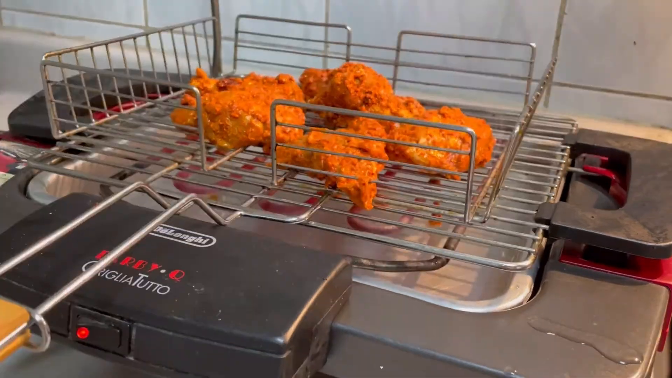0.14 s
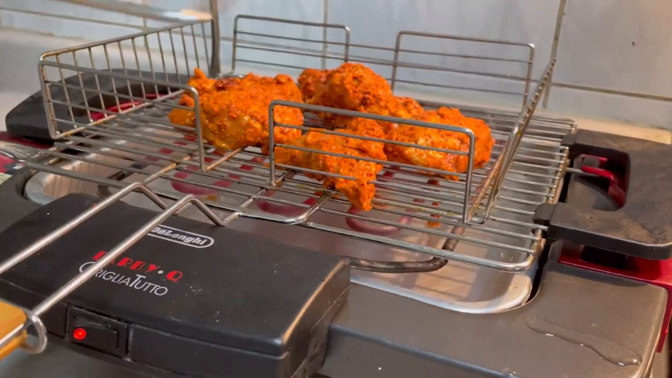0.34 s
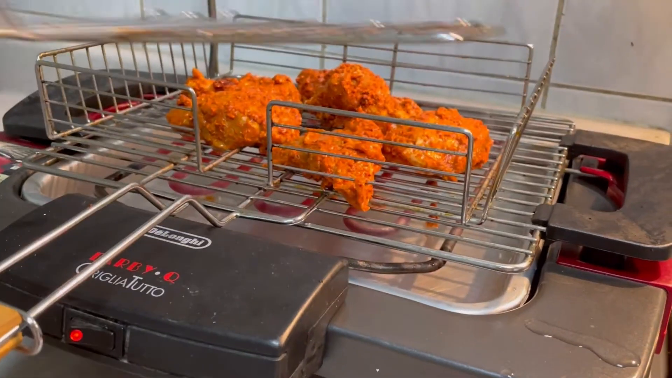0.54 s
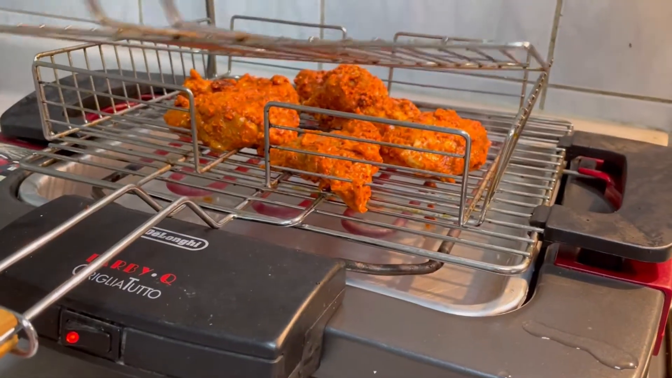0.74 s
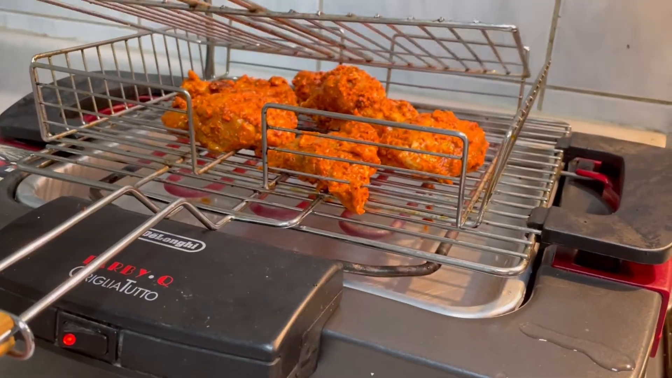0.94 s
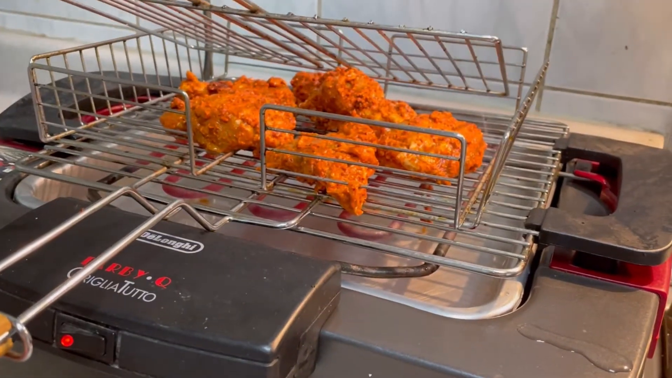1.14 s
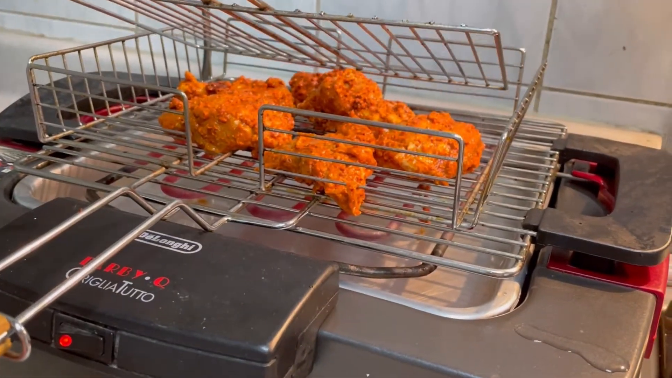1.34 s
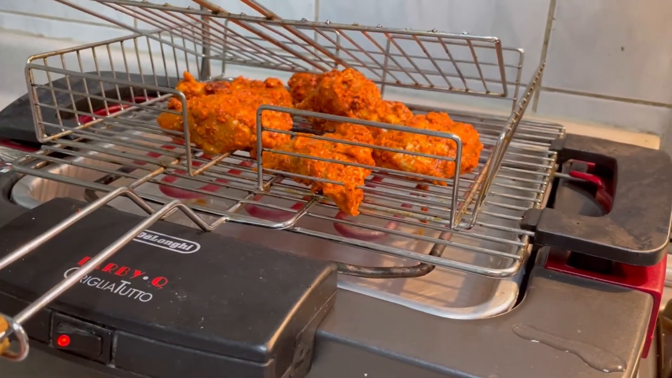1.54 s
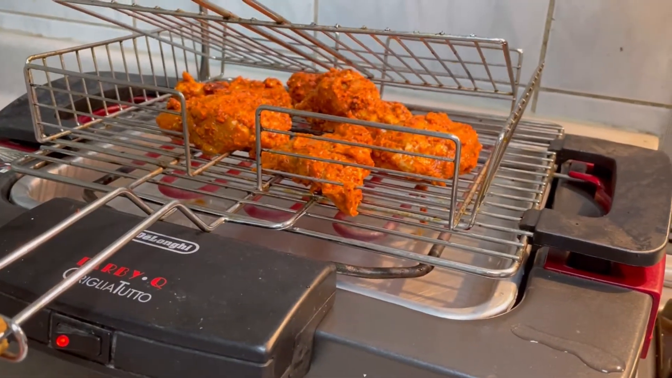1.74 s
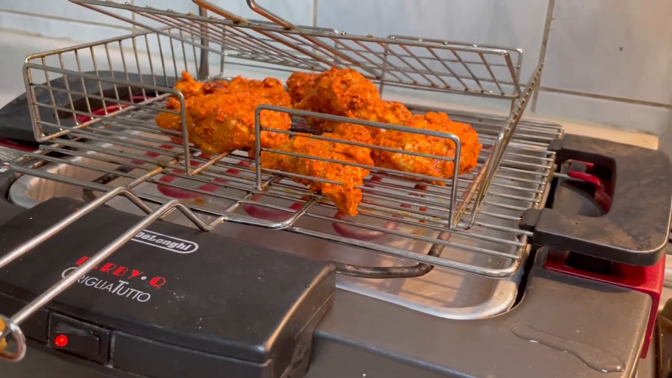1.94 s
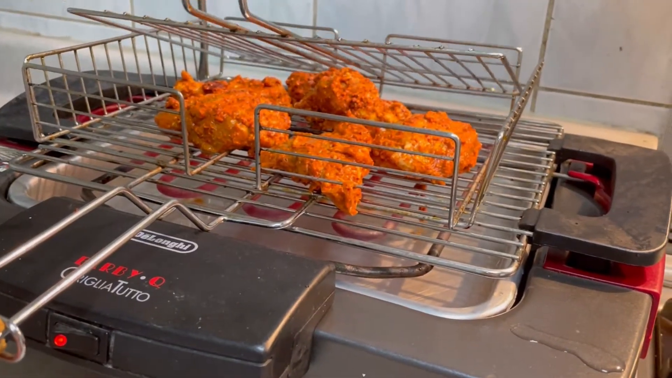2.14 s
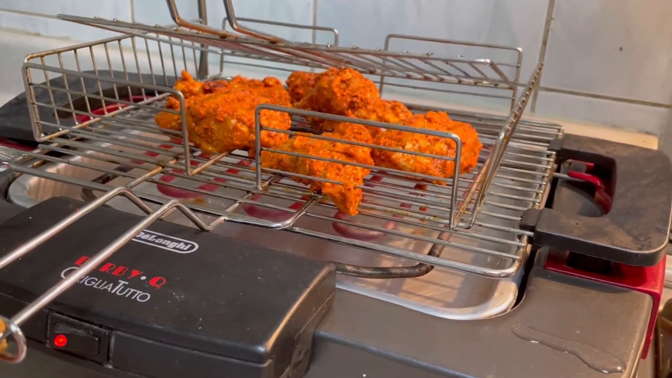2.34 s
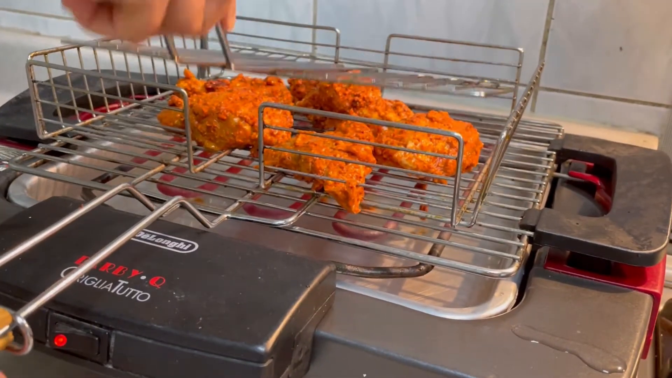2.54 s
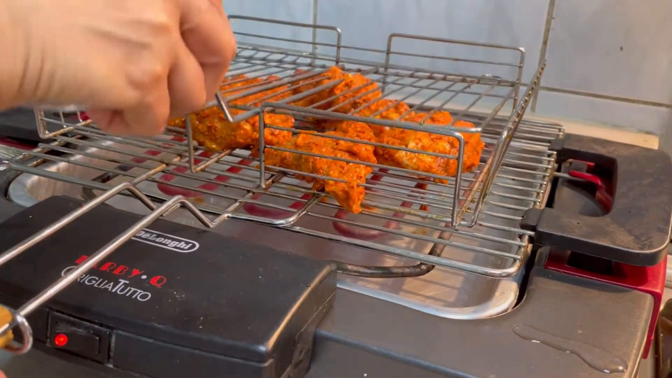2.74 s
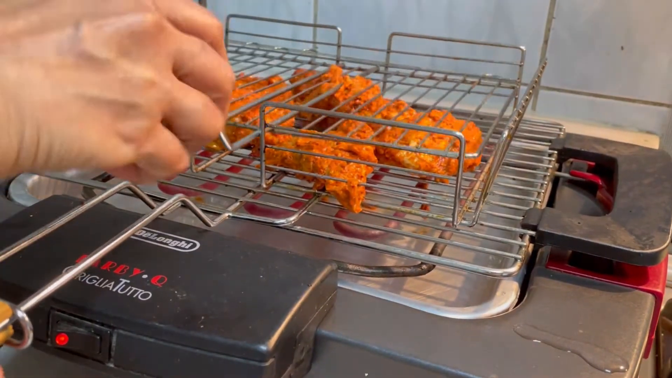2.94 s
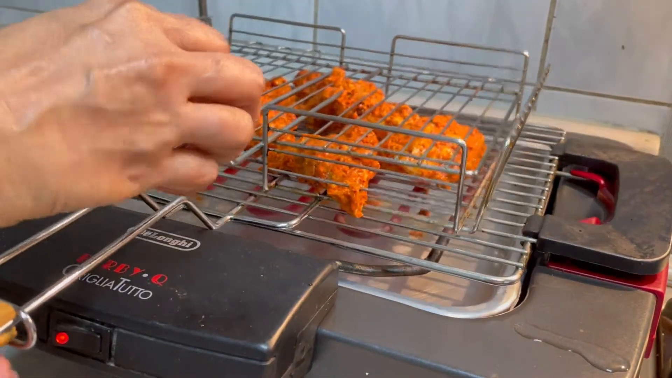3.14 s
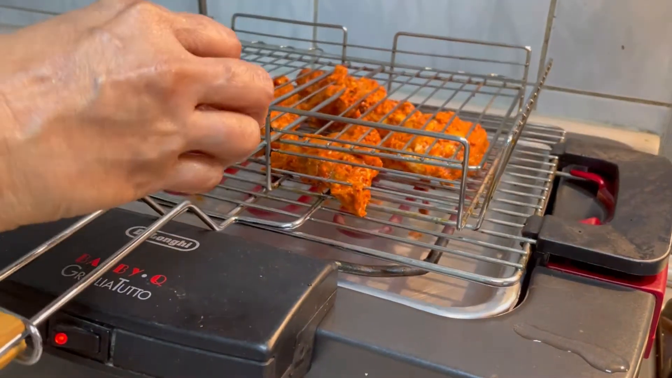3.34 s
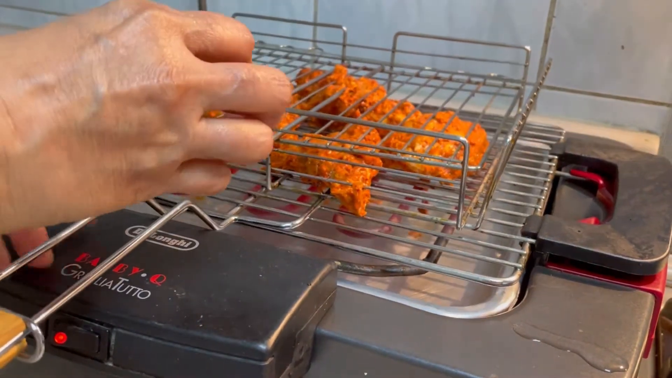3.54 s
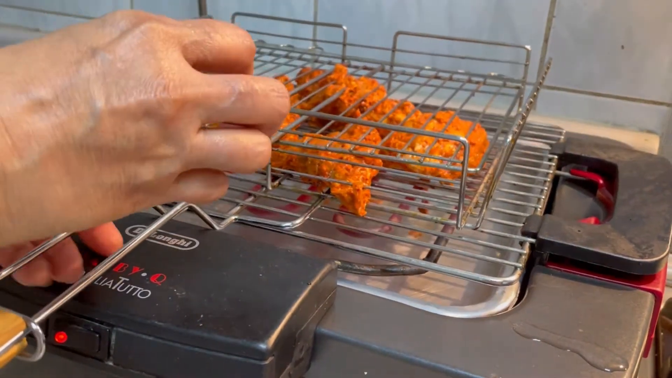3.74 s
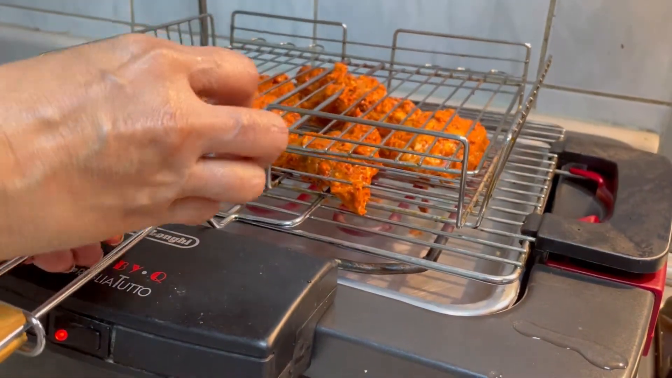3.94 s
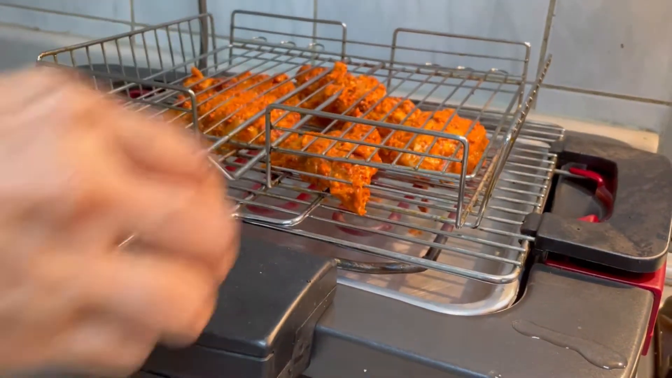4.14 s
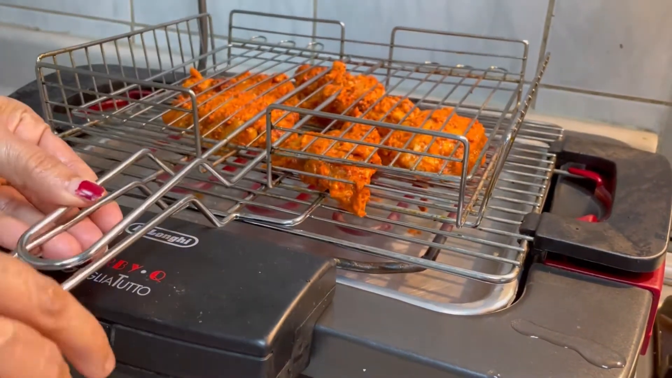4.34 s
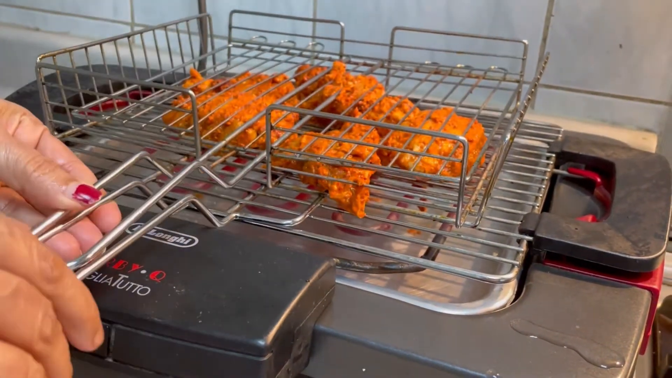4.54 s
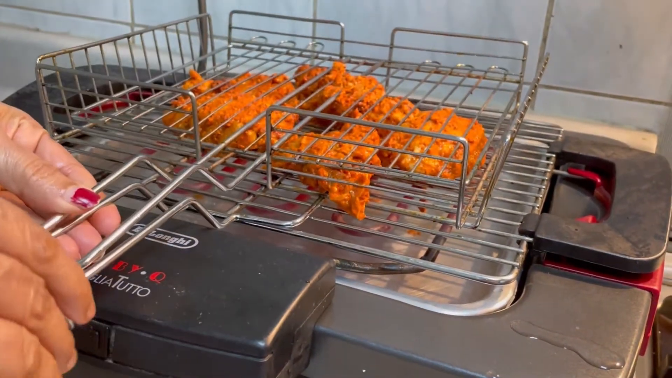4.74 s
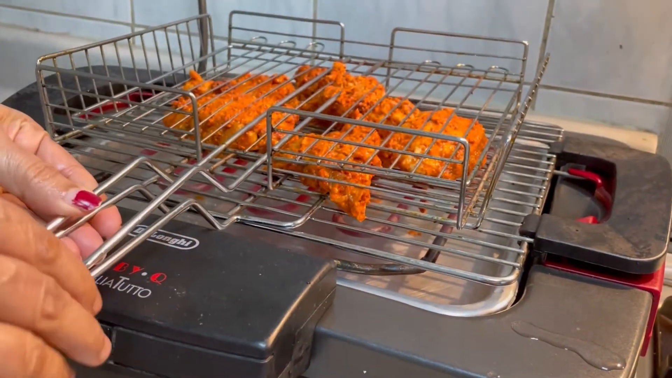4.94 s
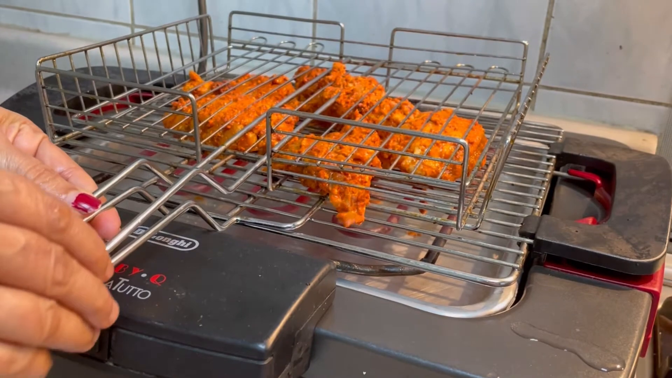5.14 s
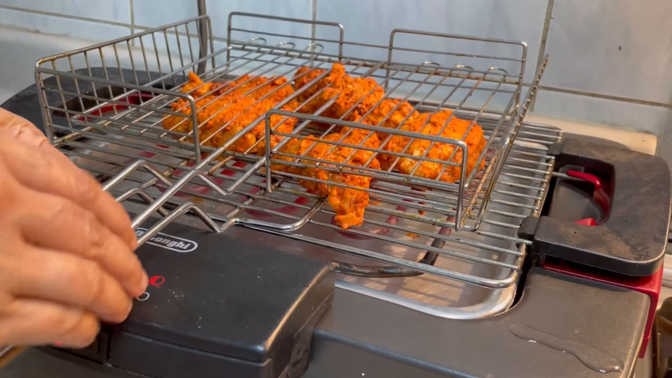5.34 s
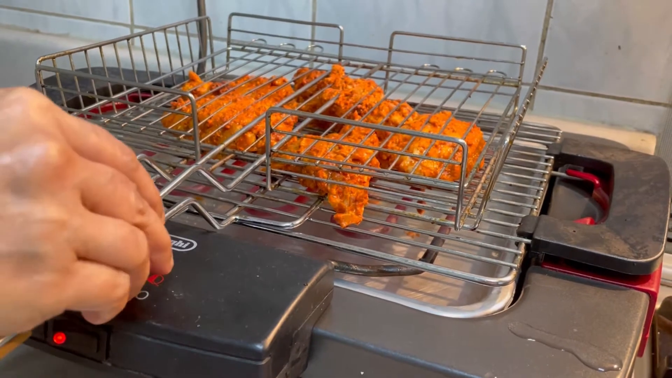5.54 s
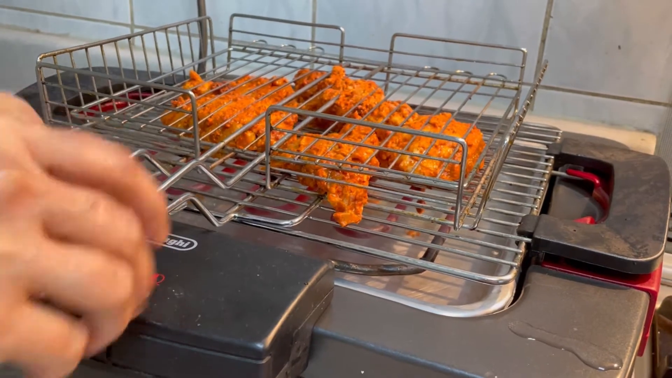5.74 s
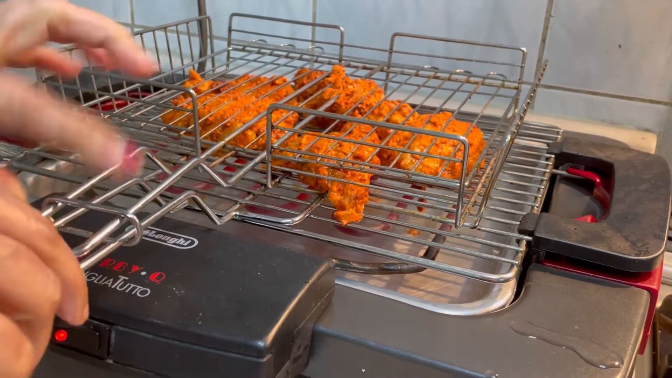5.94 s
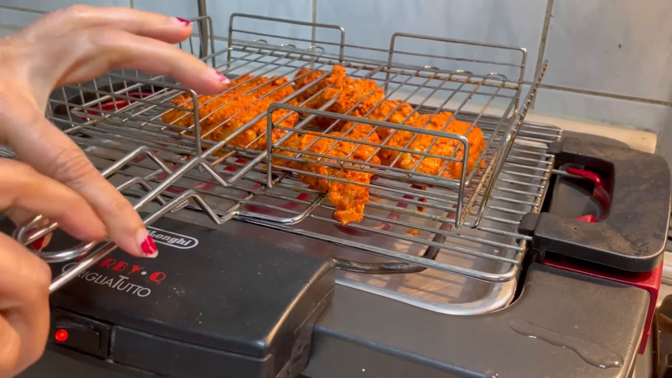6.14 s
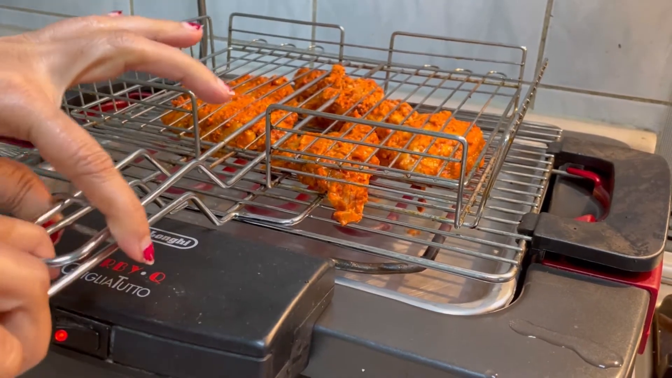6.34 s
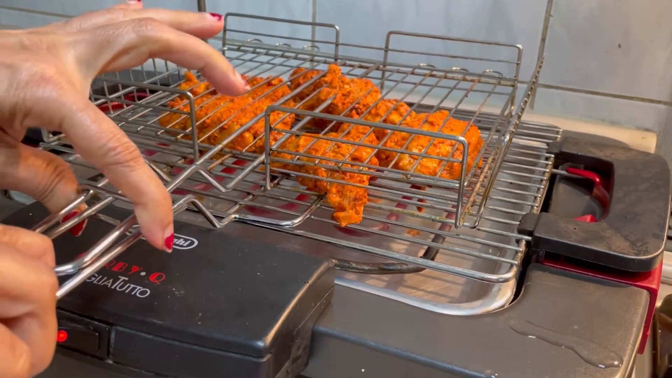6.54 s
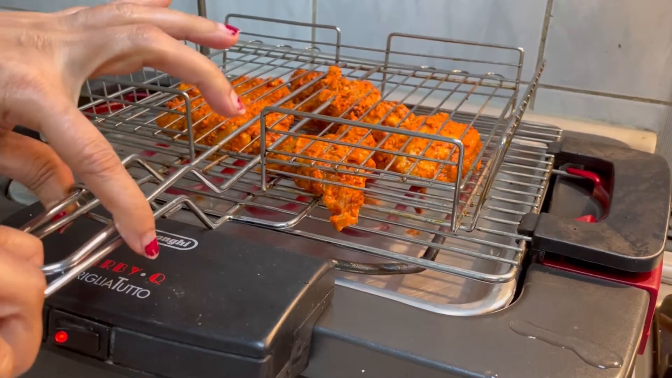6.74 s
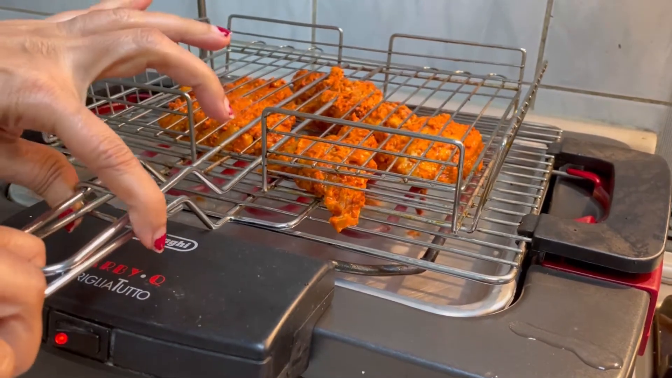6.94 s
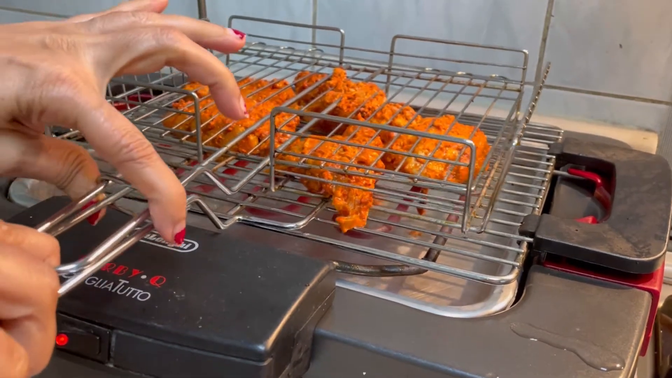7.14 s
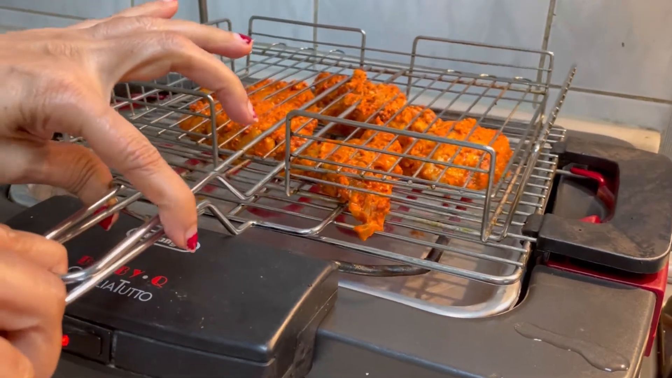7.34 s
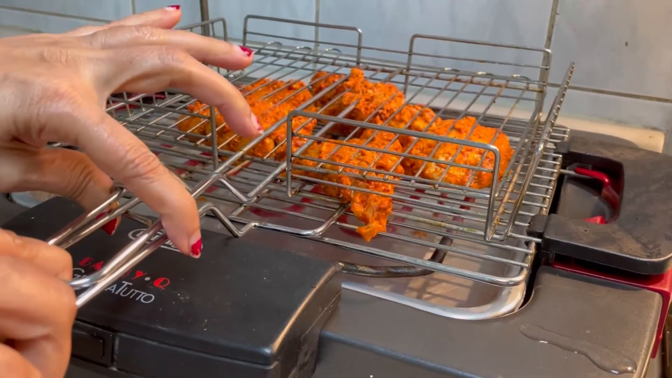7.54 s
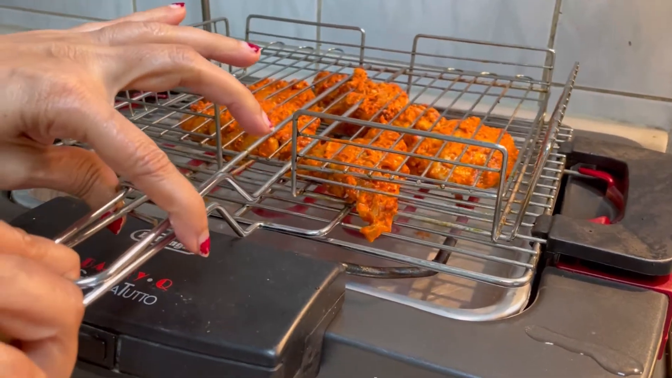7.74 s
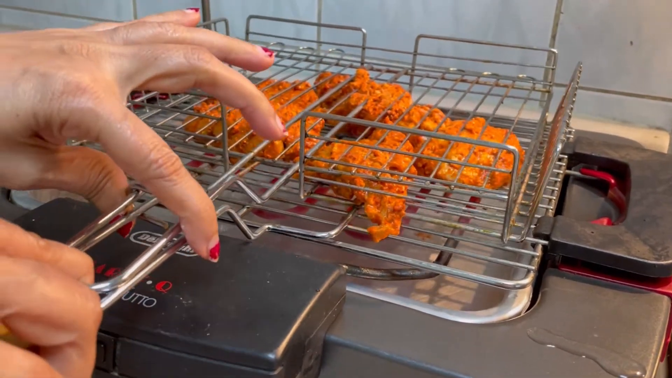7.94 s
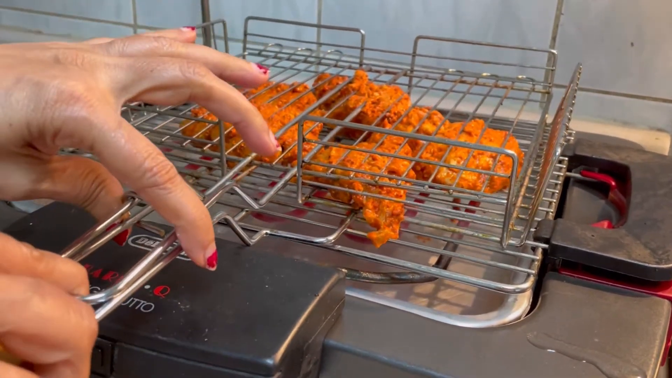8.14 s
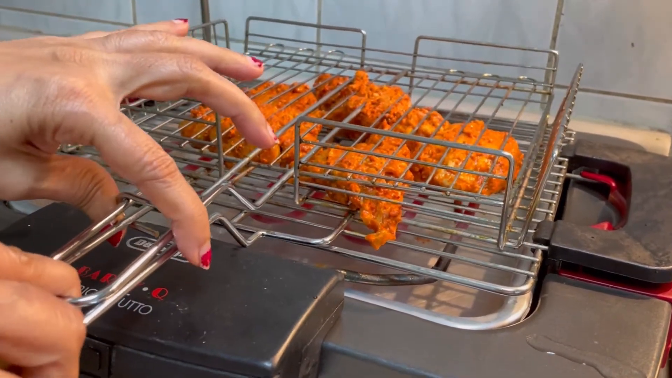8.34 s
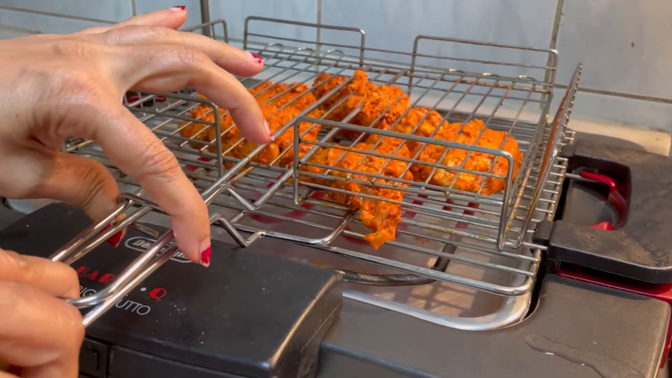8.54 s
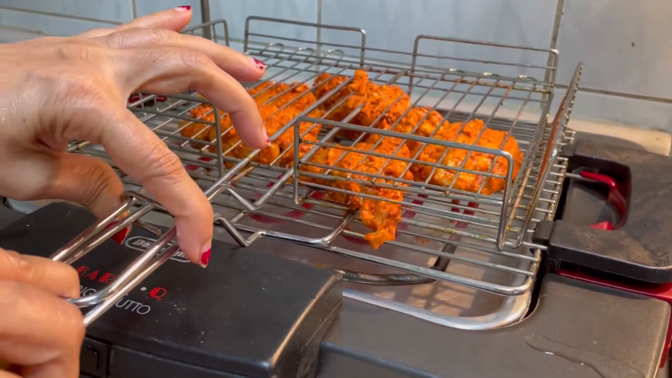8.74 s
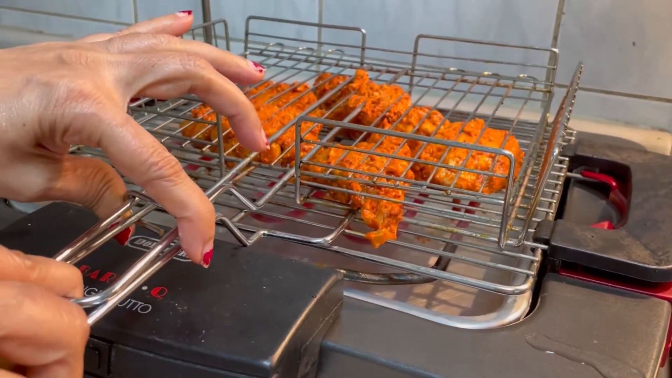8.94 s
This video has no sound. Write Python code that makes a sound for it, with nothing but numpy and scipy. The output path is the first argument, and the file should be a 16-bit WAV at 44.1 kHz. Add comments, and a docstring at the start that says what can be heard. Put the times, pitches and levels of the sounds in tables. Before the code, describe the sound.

Fat sizzles quietly on an electric grill throughout, with tiny spits and a faint low drone, joined by a soft rush of air from about 2 seconds. At 0.7 seconds a wire basket gives a bright tick and a soft bump. From about 2 to 3.6 seconds its lid knocks, clinks and scrapes into place, lightly thumping the grill housing. At about 4.5 seconds the sprung steel handles snap together with a sharp, ringing clack and a short rattle, by far the loudest sound. Light wire flicks and dull handle clunks follow from 5.3 to 5.8 seconds, with a few more knocks and brief scrapes between 6.4 and 7.5. Faint finger scuffs come around 8 seconds. The hiss swells gently near 3.3, 4.6, 5.7 and 7.5 seconds, then eases toward the end at 9. Everything is close, with a short, small-kitchen reverberation.

```python
"""Grill basket on an electric grill.

A wire basket of chicken is closed in a small kitchen. The lid knocks and scrapes into place,
ringing wires and frame and thumping the housing. The sprung steel handles snap together,
then the basket is nudged about by its held handle. Fat sizzles and spits faintly throughout
in countless tiny bursts, over a low drone and a soft rush of air."""
import sys
import numpy as np
from scipy import signal
from scipy.fft import rfft, irfft
from scipy.io import wavfile
from scipy.ndimage import uniform_filter1d

SR = 44100
rng = np.random.default_rng(int(sys.argv[2]) if len(sys.argv) > 2 else 0)


def to_wav(s):
    """Save 16-bit WAV."""
    ch = np.atleast_2d(s).T  # columns
    pcm = np.round(np.clip(ch, -1, 1) * 32767)  # PCM
    wavfile.write(sys.argv[1], SR, pcm.astype(np.int16))


N = 400862
TIME_S, ALL_HZ = np.arange(N) / SR, np.fft.rfftfreq(N, 1 / SR) + 1
HIT_SIZE = 32768
HIT_S, HIT_HZ = np.arange(HIT_SIZE) / SR, np.fft.rfftfreq(HIT_SIZE, 1 / SR) + 1

# low drone: freq_hz, gain_db
DRONE_SPECTRUM = [(20, -25), (38, -16), (54, -13), (68, -7), (83, 0.5), (97, -12), (125, -7), (170, -20.5),
                  (400, -36), (2000, -73)]
# drone, growing in two steps: time_s, level_db
DRONE_ENVELOPE = [(.5, -69), (.75, -64.5), (2.0, -65), (2.5, -59), (4, -60), (9, -58.5)]
# rush of air: freq_hz, gain_db
RUSH_SPECTRUM = [(20, -37), (45, -6), (110, -8), (180, 1.5), (270, 2), (420, -2.5), (650, -9.5),
                 (1000, -13.5), (2000, -25), (8000, -76)]
# rush, setting in and holding: time_s, level_db
RUSH_ENVELOPE = [(1.75, -74.5), (2.0, -61.5), (4.8, -61.5)]
# steady frying: freq_hz, gain_db
FRYING_SPECTRUM = [(30, -31), (200, -4.5), (600, -1), (950, -12), (1350, -1), (1650, -6), (1950, 3.5),
                   (2350, 0), (2750, 0.5), (3400, -7.5), (5500, -12), (11500, -6), (13300, -3.5),
                   (14400, -19), (16000, 1)]
# hiss of juice on the element: freq_hz, gain_db
HISS_SPECTRUM = [(100, -11), (400, -55), (1000, 2), (1450, -1), (2000, 4), (3200, -1), (4500, 3.5),
                 (5700, -2), (7000, 3.5), (9500, 8.5), (12800, 2.5), (14300, 7.5), (16000, -1.5)]
# juice runs as the basket is pressed or shifted: start_s, swell_s, peak_db (before trim)
JUICE_RUNS = [(0.66, 0.066, -53.5), (0.8, 0.19, -64), (3.0, 0.34, -50.5), (4.3, 0.28, -49),
              (5.35, 0.3, -52.5), (6.62, 0.089, -52.5), (7.08, 0.21, -52), (7.39, 0.12, -47.5),
              (7.8, 0.24, -52)]
# thin high sizzle, sinking as the lid comes down: time_s, level_db
THIN_ENVELOPE = [(1.8, -69.5), (2.5, -66), (3.2, -82)]
# loudest spits of fat: start_s, tick_db, pop_db
FAT_SPITS = [(0.0738, -66, -57), (0.231, -71.5, -61), (0.3272, -61, -62), (0.7395, -66, -63),
             (0.934, -62, -64), (0.969, -65, -59), (1.1828, -59, -65), (1.4248, -61, -65),
             (3.5922, -69, -58), (4.1965, -62, -56), (4.361, -66, -55.5)]
# tick of a spit: freq_hz, gain_db
SPIT_SPECTRUM = [(1000, -23), (4000, -27), (6500, 4), (8500, 6), (12500, 17), (16000, -18)]
# bursting blister: freq_hz, width_hz, gain_db
POP_MODES = [(1350, 520, -6.5), (2150, 800, -6), (2620, 170, 4.5), (4100, 2200, -3.5)]

# light flicks of a short wire: start_s, level_db
FLICKS = [(0.659, -65), (2.66, -77), (5.2613, -56.5), (5.355, -62), (5.403, -56.5)]
# short wire: freq_hz, width_hz, gain_db
SHORT_WIRE_MODES = [(3470, 140, 4), (4000, 240, -4), (5100, 940, -14)]
# wire on wire: start_s, chatter_s, frame_db, extra_clink_db, first_hz, second_hz, wire_db
WIRE_KNOCKS = [(0.662, 0.0054, -72, -6, 1010, 1330, -54.5), (2.179, 0.0018, -48.5, 0.5, 855, 1810, -49),
               (2.192, 0.0088, -52.5, -14, 460, 210, -53), (2.358, 0.0052, -54.5, -3, 770, 1230, -47.5),
               (2.385, .003, -55, -1.5, 900, 1880, -63), (3.034, 0.0071, -52.5, -3.5, 626, 2040, -66),
               (3.074, 0.033, -48, 3.5, 1080, 1400, -48), (3.133, 0.02, -53, -11, 890, 606, -60),
               (3.215, 0.21, -57, -2, 1010, 1120, -60), (3.565, 0.024, -56.5, -5, 1030, 694, -60),
               (4.562, 0.0071, -48, -1, 920, 222, -40.5), (4.593, 0.014, -55, -10, 520, 1130, -57.5),
               (4.615, 0.008, -52.5, -5, 1216, 2610, -47), (4.742, .006, -58, -8, 1070, 885, -60),
               (4.764, .012, -63.5, 4, 450, 1210, -53.5)]
# first bright contact: freq_hz, gain_db
TICK_SPECTRUM = [(1500, -3.5), (3500, 3.5), (5500, -0.5), (7000, 5), (10000, 7), (13500, 9.5), (16000, 5.5)]
# cross wires: freq_hz, width_hz, gain_db
CROSS_WIRE_MODES = [(1854, 350, 8.5), (2030, 100, -6), (2110, 150, 11), (2550, 280, -3.5), (2860, 130, 0),
                    (3270, 410, 2.5), (4240, 520, -1), (5000, 680, 0)]
# loaded frame: freq_hz, width_hz, gain_db
FRAME_MODES = [(444, 24, 5.5), (650, 190, -2), (800, 170, -4), (910, 70, -10), (980, 44, -9), (1127, 30, 2),
               (1250, 88, -21), (1340, 60, -11)]
# grill housing: freq_hz, width_hz, gain_db
HOUSING_MODES = [(56.5, 18, 4.5), (85.8, 13, 10), (114, 37, 11.5), (185, 30, -33), (237, 18, -7)]
# glancing wire ends: start_s, chatter_s, tick_db
WIRE_GRAZES = [(0.67, 0.0095, -40.5), (2.355, 0.0093, -54), (3.081, 0.046, -53), (1.446, 0.011, -57),
               (2.656, 0.011, -48)]
# basket leaning on the housing: start_s, press_s, cutoff_hz, level_db
HOUSING_BUMPS = [(0.675, 0.03, 300, -56), (1.462, 0.062, 49, -55.5), (2.395, 0.0099, 298, -48),
                 (2.671, 0.058, 299, -50.5), (3.14, 0.025, 300, -48.5), (3.255, .03, 300, -51.5),
                 (6.69, 0.039, 50, -53.5)]
# wire sliding on wire: start_s, length_s, pitch_hz, half_width_hz, level_db
WIRE_SLIDES = [(1.931, 0.037, 770, 198, -54.5), (2.167, 0.025, 770, 280, -47.5),
               (2.586, 0.15, 845, 278, -62), (2.922, 0.04, 1020, 80.6, -59), (3.052, 0.056, 990, 400, -49),
               (3.228, 0.035, 1030, 60, -59.5), (6.655, 0.056, 900, 350, -58.5),
               (7.425, 0.031, 1010, 220, -56)]

# handles shutting (slip, strike, rebound): start_s, level_db
SNAP_CONTACTS = [(4.547, -31), (4.55, -22.5), (4.5531, -30.5)]
# crack of the snap: freq_hz, gain_db
CRACK_SPECTRUM = [(30, -40), (200, -14), (400, -18), (650, -19), (1050, -14), (1600, -9.5), (2150, 0.5),
                  (2900, -4), (3800, 2), (4800, -10.5), (7000, -7.5), (9500, 0.5), (12500, -3.5),
                  (15500, -6.5)]
# sprung handles: freq_hz, width_hz, gain_db
HANDLE_MODES = [(191, 10, -7), (227, 10, -4), (335, 8, -9), (427, 1.4, -9), (441, 1.4, -8.5),
                (452, 1.8, -8.5), (894, 14, -2), (946, 16, -2), (1020, 20, -5), (1109, 12, 3),
                (1250, 20, -4), (2075, 16, 5), (2150, 18, 4), (2270, 16, -2), (2620, 14, -1), (2791, 20, 0),
                (3099, 20, 0), (3400, 36, 0), (3885, 36, 4), (4032, 22, -3), (5130, 30, -4), (5411, 26, -2),
                (6342, 30, -5), (6837, 30, -5), (7510, 40, -5), (9290, 50, -1), (9701, 40, -3),
                (11783, 40, 5), (11979, 32, 0), (13139, 40, 2), (13862, 36, 0), (14200, 40, -1),
                (14509, 55, 1)]
# loose wires rattling: freq_hz, gain_db
RATTLE_SPECTRUM = [(30, -36), (200, -13), (450, 3.5), (700, -4.5), (1100, 5.5), (1600, -9), (2100, 1),
                   (2600, 1), (3100, -3), (3900, 0), (4800, -8.5), (7000, -12), (9500, 1), (15500, -11.5)]
# held handle hitting the housing: start_s, level_db, cutoff_hz, wire_hz, wire_db
HANDLE_HITS = [(5.3505, -50, 3030, 676, -49.5), (5.415, -52.5, 2400, 900, -54),
               (5.431, -53, 1400, 660, -53), (5.644, -52, 3200, 930, -55), (5.833, -60, 2000, 880, -62),
               (6.449, -56, 3000, 437, -56.5), (7.078, -51.5, 3000, 834, -57.5)]
# hand-damped handle: freq_hz, width_hz, gain_db
HELD_HANDLE_MODES = [(466, 33, 2.5), (556, 120, -0.5), (680, 32, -1), (870, 44, 5), (1080, 220, -2),
                     (1210, 60, 0), (1780, 170, -2), (2100, 84, -8), (2850, 550, -15)]
# fingers shifting grip: start_s, length_s, pitch_hz, half_width_hz, level_db
GRIP_SCUFFS = [(5.862, 0.019, 270, 80, -61), (7.755, 0.052, 377, 80, -61.5), (7.905, 0.022, 344, 80, -66),
               (8.418, 0.015, 323, 118.4, -58)]

# kitchen reverberation: freq_hz, t60_s
KITCHEN_DECAY = [(100, 0.58), (500, 0.44), (1200, 0.32), (3000, 0.26), (7000, 0.19), (14000, 0.025)]
# two close microphone ports: freq_hz, left_lead_rad, left_minus_right_db
MIC_PORTS = [(100, 0, -1), (500, .1, .5), (1200, .5, 2.5), (2400, .9, .7), (4500, .7, 2.5), (6500, -.8, .5),
             (7700, -2.5, 0), (8600, -3.1, 0), (10500, -4.3, 0), (12300, -5.9, 0), (16000, -6.0, 0)]


def undb(db):
    """Decibels to gain."""
    return 10 ** (np.asarray(db) / 20)


def unit(x):
    """Scale to rms 1."""
    return x / np.sqrt(np.mean(x ** 2))


def over_hz(table, hz):
    """Interpolate each column over log frequency."""
    points_hz, *columns = np.transpose(table)
    return np.squeeze([np.interp(np.log(hz), np.log(points_hz), column) for column in columns])


def over_time(envelope):
    """Gain from rows of time_s, level_db."""
    return undb(np.interp(TIME_S, *np.transpose(envelope)))


def colour(x, spectrum):
    """Shape a full-length signal by a spectrum; rms 1."""
    return unit(irfft(rfft(x) * undb(over_hz(spectrum, ALL_HZ)), N))


def resonances(modes, place_db=0):
    """Modal response; the place of a touch scatters the mode gains by place_db."""
    return sum(undb(db + place_db * rng.standard_normal())
               / (1 + 1j * (HIT_HZ ** 2 - hz ** 2) / (width_hz * HIT_HZ)) for hz, width_hz, db in modes)


def soft(cutoff_hz):
    """Low-pass of a contact of finite length."""
    return 1 / np.sqrt(1 + (HIT_HZ / cutoff_hz) ** 6)


def add(track, start_s, sound):
    """Mix a sound in at start_s."""
    start = max(int(start_s * SR), 0)
    track[start:start + len(sound)] += sound[:N - start]


def contact(response, chatter_s, dispersion=.12):
    """Dying burst of tiny contacts through a response; energy of 20 ms at rms 1."""
    burst = rng.standard_normal(HIT_SIZE) * np.exp(-HIT_S / max(chatter_s, 1e-4))
    lag_s = dispersion / np.sqrt(HIT_HZ + 50)  # bending waves: lows arrive late
    delay = np.exp(-2j * np.pi * np.cumsum(lag_s) * SR / HIT_SIZE)
    return unit(irfft(rfft(burst) * response * delay)) * np.sqrt(.02 * SR / HIT_SIZE)


def impulses(rate_hz, scatter_db):
    """Random tiny bursts; scatter_db makes a few much bigger."""
    sizes = undb(scatter_db * np.minimum(rng.exponential(size=N), 6))
    return (rng.random(N) < rate_hz / SR) * rng.standard_normal(N) * sizes


def wander(rate_hz):
    """Random steps, smoothed twice; deviation near 1."""
    hold = int(SR / rate_hz)
    steps = np.repeat(rng.standard_normal(N // hold + 1), hold)
    return 1.3 * uniform_filter1d(uniform_filter1d(steps, hold), hold)[:N]


def spread(centre, sides, side_db, mono_above_hz=9000):
    """Mid/side to stereo; the top treble is alike in both channels."""
    sides = signal.sosfilt(signal.butter(2, mono_above_hz, fs=SR, output="sos"), sides)
    return centre + undb(side_db) * sides * np.array([[1], [-1]])


def background(waver_db=0.5):
    """A wavering low drone and a soft rush of air."""
    drone = spread(*(colour(rng.standard_normal(N), DRONE_SPECTRUM) for _ in range(2)), side_db=-14.5)
    rush = spread(*(colour(rng.standard_normal(N), RUSH_SPECTRUM) for _ in range(2)), side_db=-4)
    waver = undb(waver_db * wander(rate_hz=3.265))
    return drone * over_time(DRONE_ENVELOPE) * waver + rush * over_time(RUSH_ENVELOPE)


def boiling(simmer_db=-59.5, fade_start_s=8.3, fade_db_per_s=6, steepness=1.13):
    """Hiss gain: runs of juice swell and dry up over a simmer that fades as the basket is drawn back."""
    power = undb(simmer_db - fade_db_per_s * np.maximum(TIME_S - fade_start_s, 0)) ** 2
    for start_s, swell_s, peak_db in JUICE_RUNS:
        age = np.maximum(TIME_S - start_s, 0) / swell_s
        power += (undb(peak_db) * (age * np.exp(1 - age)) ** steepness) ** 2
    return np.sqrt(power)


def sizzle(frying_db=-58, hiss_trim_db=-2, waver_db=.5, thin_hz=13400, thin_width_hz=900):
    """Fat fries steadily, juice hisses on the element, and a thin band sings while the lid is open."""
    frying = spread(*(colour(impulses(5000, 0.5), FRYING_SPECTRUM) for _ in range(2)), side_db=-6)
    hiss = spread(*(colour(impulses(14000, 1), HISS_SPECTRUM) for _ in range(2)), side_db=-11.5)
    thin_band = 1 / (1 + (2 * (ALL_HZ - thin_hz) / thin_width_hz) ** 2)
    thin = unit(irfft(rfft(impulses(rate_hz=3700, scatter_db=5.5)) * thin_band, N))
    frying *= undb(frying_db + waver_db * wander(rate_hz=7.2))
    hiss *= boiling() * undb(hiss_trim_db + waver_db * wander(rate_hz=5.3))
    return frying + hiss + thin * over_time(THIN_ENVELOPE)


def spits(crackle_db=-72, crackle_rate_hz=70, tick_s=.0003, pop_s=.002, dispersion=.01):
    """Fat droplets burst with a tick and a pop; finer ones crackle at random."""
    out = np.zeros(N)
    tick, pop = undb(over_hz(SPIT_SPECTRUM, HIT_HZ)), resonances(POP_MODES)
    for start_s, tick_db, pop_db in FAT_SPITS:
        add(out, start_s, undb(tick_db) * contact(tick, tick_s, dispersion))
        add(out, start_s, undb(pop_db) * contact(pop, pop_s, dispersion))
    drops = (rng.random(N) < crackle_rate_hz / SR) * rng.uniform(-1, 1, N)
    burst = contact(tick, tick_s, dispersion) + contact(pop, tick_s, dispersion)
    return out + undb(crackle_db) * unit(signal.fftconvolve(drops, burst)[:N])


def flicks(chatter_s=0.0034):
    """A light flick rings one short wire."""
    out = np.zeros(N)
    for start_s, db in FLICKS:
        add(out, start_s, undb(db) * contact(resonances(SHORT_WIRE_MODES), chatter_s, dispersion=0))
    return out


def housing(cutoff_hz=260):
    """Response of the housing, whose soft feet pass only the lows."""
    return resonances(HOUSING_MODES) / (1 + 1j * HIT_HZ / cutoff_hz) ** 2


def touch(chatter_s, frame_db, clink_db, tick_db, thump_db):
    """A touch ticks, rings the cross wires and the heavier frame, then thumps the housing."""
    settle_s, thump_s, thump_lag_s = 0.0052, 0.011, 0.0039
    tick = undb(tick_db) * contact(undb(over_hz(TICK_SPECTRUM, HIT_HZ)), chatter_s)
    cross_wires = resonances(CROSS_WIRE_MODES, place_db=2) * soft(cutoff_hz=3800)
    clink = undb(clink_db) * contact(cross_wires, chatter_s)
    frame = resonances(FRAME_MODES, place_db=2) * soft(cutoff_hz=1600)
    clunk = undb(frame_db) * contact(frame, chatter_s + settle_s)
    thump = undb(thump_db) * contact(housing(), chatter_s + thump_s)
    return tick + clink + clunk + np.interp(HIT_S - thump_lag_s, HIT_S, thump, left=0)


def wire(pitch_hz, chatter_s, width_hz=59):
    """One wire rings at its own pitch while the contact chatters."""
    return contact(resonances([(pitch_hz, width_hz, 0)]) * soft(2 * pitch_hz), chatter_s)


def knocks(second_wire_db=-4.5):
    """Blunt knocks ring the basket and the two wires that meet."""
    out = np.zeros(N)
    for start_s, chatter_s, db, extra_clink_db, first_hz, second_hz, wire_db in WIRE_KNOCKS:
        clink_db = db + extra_clink_db - 0.5
        basket = touch(chatter_s, frame_db=db, clink_db=clink_db, tick_db=db - 9, thump_db=db + 1)
        wires = wire(first_hz, chatter_s) + undb(second_wire_db) * wire(second_hz, chatter_s)
        add(out, start_s, basket + undb(wire_db) * wires)
    return out


def grazes():
    """A wire end glances off the basket: mostly tick."""
    out = np.zeros(N)
    for start_s, chatter_s, db in WIRE_GRAZES:
        graze = touch(chatter_s, frame_db=db - 15, clink_db=db - 49, tick_db=db, thump_db=db - 13.5)
        add(out, start_s, graze)
    return out


def bumps():
    """The basket leans on the grill; the housing gives a soft low bump."""
    out = np.zeros(N)
    for start_s, press_s, cutoff_hz, db in HOUSING_BUMPS:
        add(out, start_s, undb(db) * contact(housing(cutoff_hz), press_s))
    return out


def rubs(slides):
    """Stick-slip grains keep one resonance sounding through each slide."""
    out = np.zeros(N)
    for start_s, length_s, pitch_hz, half_width_hz, db in slides:
        slips = impulses(rate_hz=2300, scatter_db=1.5)[:HIT_SIZE]
        ring = irfft(rfft(slips) * resonances([(pitch_hz, 2 * half_width_hz, 0)]) ** 2)
        stroke = np.sqrt(np.hanning(int(length_s * SR)))
        add(out, start_s, undb(db) * unit(ring[:len(stroke)]) * stroke)
    return out


def handle_ring(split_at_1khz_hz=28, attack_s=0.0017):
    """The two handles differ slightly, so each mode beats with a weaker twin."""
    ring = 0
    for hz, width_hz, db in HANDLE_MODES:
        tone = np.sin(2 * np.pi * (hz * HIT_S + rng.random()))
        twin_hz = hz + split_at_1khz_hz * np.sqrt(hz / 1000) * rng.standard_normal()
        twin = np.sin(2 * np.pi * (twin_hz * HIT_S + rng.random()))
        decay = np.sqrt(width_hz / 20) * np.exp(-np.pi * width_hz * HIT_S)  # narrow: softer, longer
        ring += undb(db) * decay * (tone + .5 * twin)
    return ring * (1 - np.exp(-HIT_S / attack_s))


def rattle(decay_s=0.069):
    """Loose wires clash again and again, ever more weakly."""
    clashes = impulses(rate_hz=900, scatter_db=0)[:HIT_SIZE] * np.exp(-HIT_S / decay_s)
    clash = contact(undb(over_hz(RATTLE_SPECTRUM, HIT_HZ)), chatter_s=0)
    return signal.fftconvolve(clashes / np.linalg.norm(clashes), clash)


def snap(ring_db=-37.5, rattle_db=-31, bounce_db=-42, bounce_hz=185, jolt_db=-44):
    """The sprung handles crack together and ring; the basket rattles, bounces and jolts the grill."""
    out, crack = np.zeros(N), undb(over_hz(CRACK_SPECTRUM, HIT_HZ))
    for start_s, db in SNAP_CONTACTS:
        add(out, start_s, undb(db) * contact(crack, chatter_s=.0028, dispersion=.2))
    strike_s = SNAP_CONTACTS[1][0]
    add(out, strike_s, undb(ring_db) * handle_ring())
    add(out, strike_s, undb(rattle_db) * rattle())
    bounce = contact(resonances([(bounce_hz, 50, 0)]) ** 2, chatter_s=.002, dispersion=0.203)
    jolt = contact(housing(cutoff_hz=40), chatter_s=0.088, dispersion=0.301)
    add(out, strike_s, undb(bounce_db) * bounce + undb(jolt_db) * jolt)
    return out


def handle_knocks(grit_db=-3, grit_s=0.0047, dispersion=.17):
    """The hand damps the handle: short dull clunks with a little gritty chatter."""
    out = np.zeros(N)
    for start_s, db, cutoff_hz, wire_hz, wire_db in HANDLE_HITS:
        handle = resonances(HELD_HANDLE_MODES) * soft(cutoff_hz)
        clunk = contact(handle, 0, dispersion)
        grit = undb(grit_db) * contact(handle, grit_s, dispersion)
        add(out, start_s, undb(db) * (clunk + grit) + undb(wire_db) * wire(wire_hz, grit_s))
    return out


def kitchen(x, mono_below_hz=350, onset_s=0.00053):
    """Tiled walls return a short diffuse tail; treble dies first, bass is alike at both ports."""
    centre, sides = rng.standard_normal((2, HIT_SIZE))
    sides = irfft(rfft(sides) * HIT_HZ / (HIT_HZ + mono_below_hz))
    spectrum = rfft(spread(centre, sides, side_db=0.5))
    tail, edges_hz = 0, np.geomspace(40, SR / 2, num=13)
    for low_hz, high_hz in zip(edges_hz, edges_hz[1:]):
        t60_s = over_hz(KITCHEN_DECAY, np.sqrt(low_hz * high_hz))
        band = irfft(spectrum * ((HIT_HZ >= low_hz) & (HIT_HZ < high_hz)))
        tail += band * undb(-60 * HIT_S / t60_s)
    tail = unit(tail * (1 - np.exp(-HIT_S / onset_s))) / np.sqrt(HIT_SIZE)
    return signal.fftconvolve(x[None], tail, axes=1)[:, :N]


def scene(taps_room_db=-4, snap_room_db=-7):
    """Basket and fat in the kitchen at two close ports; basket and spits are louder on the left."""
    taps = knocks() + grazes() + flicks() + handle_knocks()
    taps = taps + rubs(WIRE_SLIDES) + rubs(GRIP_SCUFFS) + bumps() + spits()
    clack = snap()
    events = taps + clack + kitchen(undb(taps_room_db) * taps + undb(snap_room_db) * clack)
    lead_rad, balance_db = over_hz(MIC_PORTS, ALL_HZ)
    side = np.array([[.5], [-.5]])
    spectrum = rfft(events) * undb(side * balance_db) + rfft(sizzle() + background())
    return irfft(spectrum * np.exp(1j * side * lead_rad), N)


def record(dry):
    """The sound drops out for an instant; deepest bass and top treble are cut."""
    mute_start_s, mute_end_s = 2.101, 2.122
    low_hz, top_hz = 36, 15950
    gate = uniform_filter1d(1. * ((TIME_S < mute_start_s) | (TIME_S > mute_end_s)), size=40)
    dry = signal.sosfilt(signal.butter(4, low_hz, "high", fs=SR, output="sos"), dry)
    return signal.sosfilt(signal.ellip(10, .2, 70, top_hz, fs=SR, output="sos"), dry * gate)


dry = scene()
out = record(dry)
to_wav(out)
```